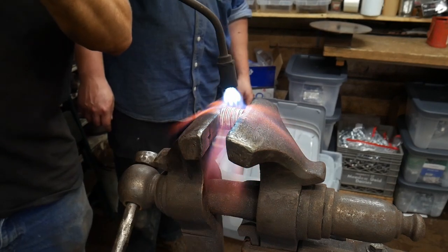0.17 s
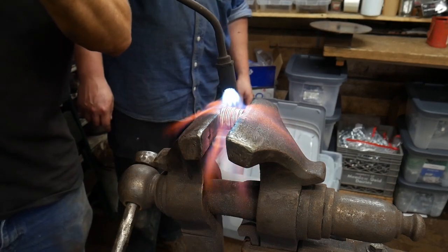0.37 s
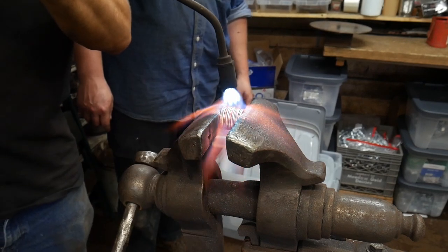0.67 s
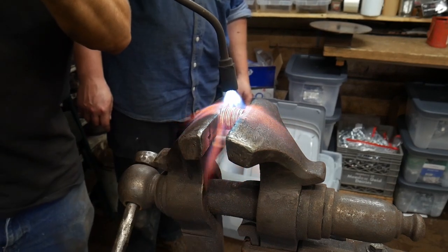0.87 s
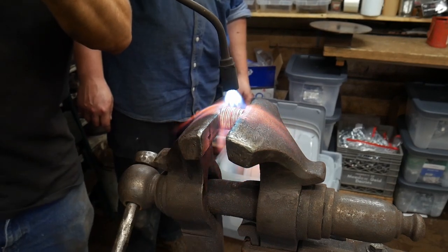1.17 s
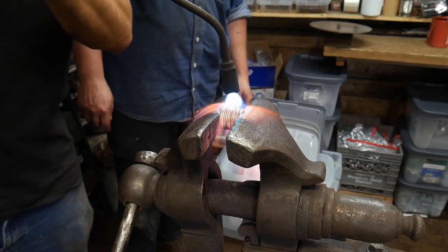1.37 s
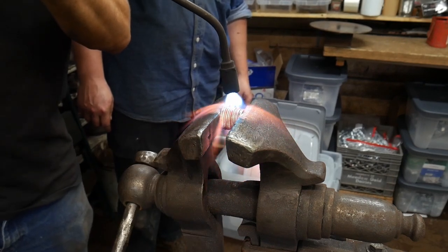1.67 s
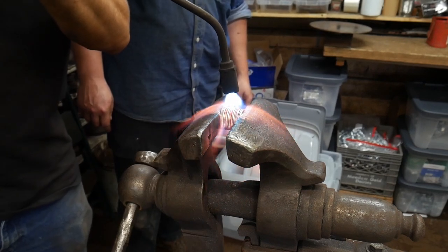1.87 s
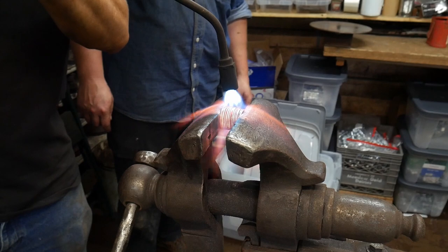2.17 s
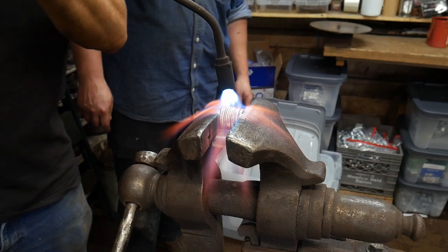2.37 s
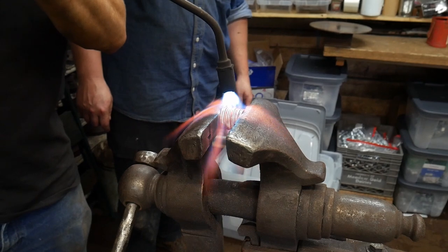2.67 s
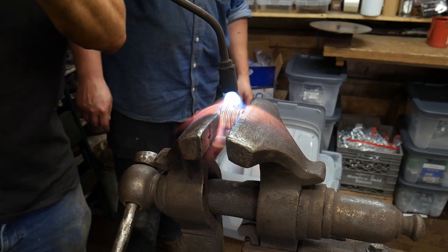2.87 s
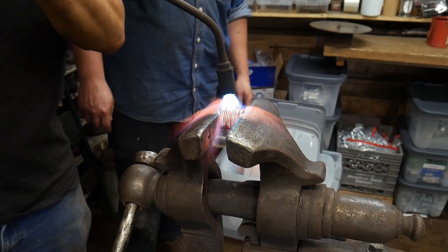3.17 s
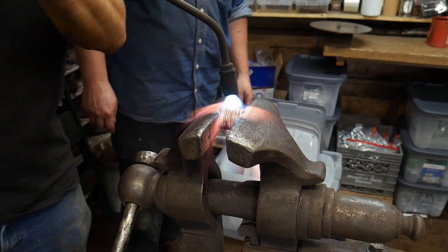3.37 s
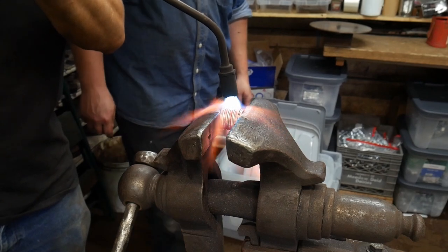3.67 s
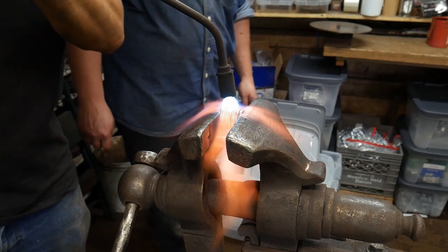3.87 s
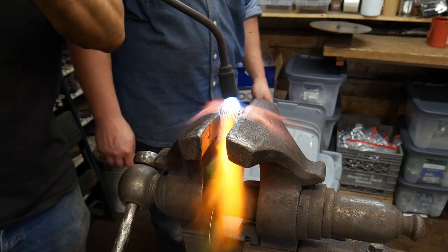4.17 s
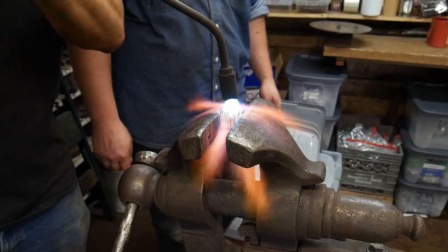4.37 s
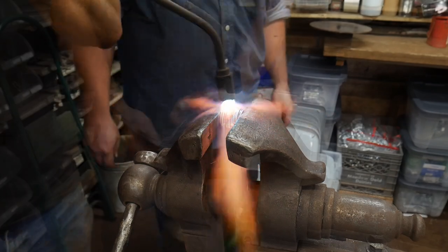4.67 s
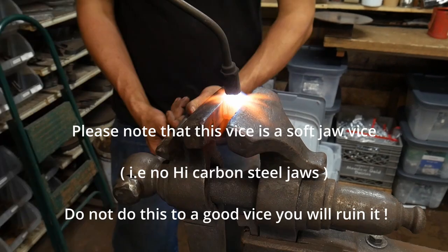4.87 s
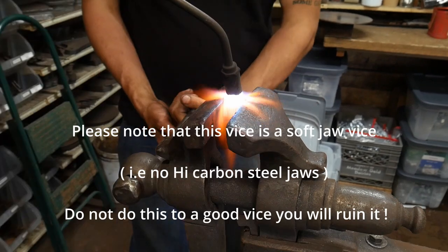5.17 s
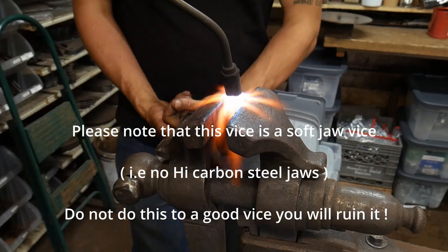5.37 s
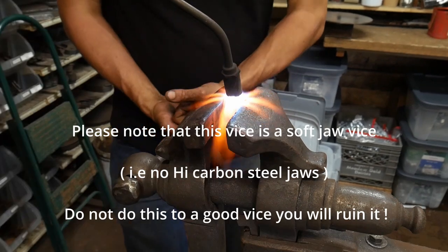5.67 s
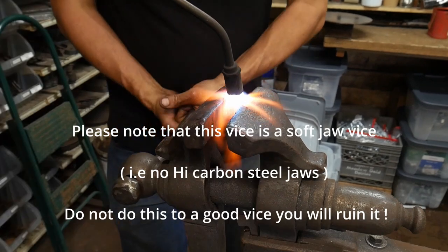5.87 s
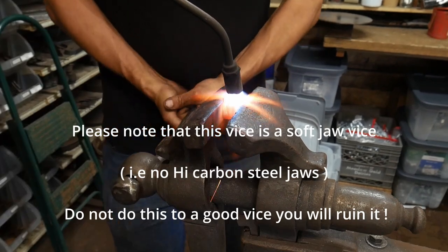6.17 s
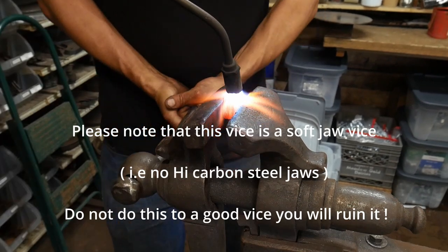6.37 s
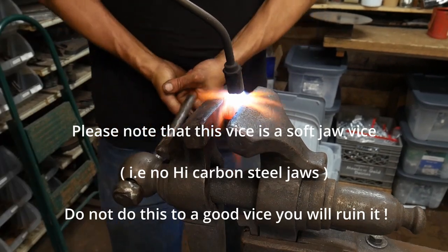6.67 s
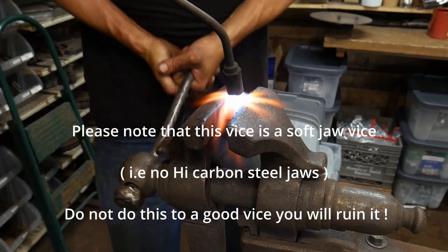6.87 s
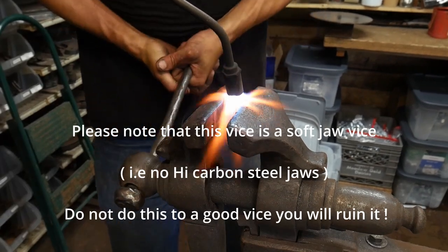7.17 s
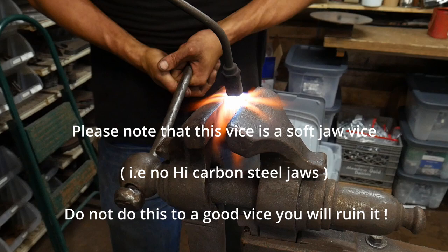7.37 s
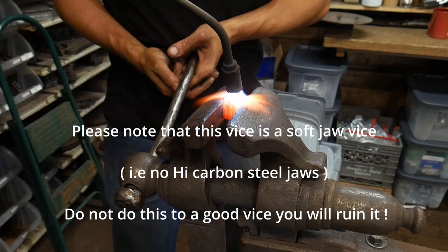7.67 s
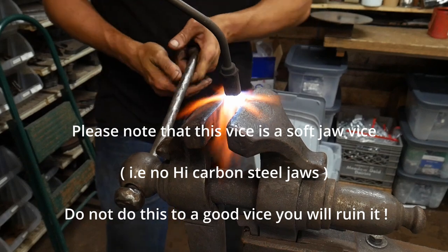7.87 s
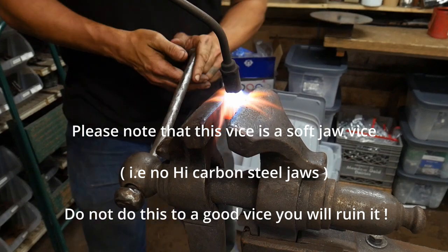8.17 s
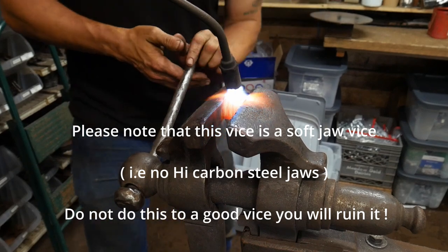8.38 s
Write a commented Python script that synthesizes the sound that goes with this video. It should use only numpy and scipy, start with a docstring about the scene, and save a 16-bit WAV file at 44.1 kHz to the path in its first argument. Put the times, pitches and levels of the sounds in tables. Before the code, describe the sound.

Already burning at the start, a strong torch jet rushes against metal in a small dry workshop. The first half is fuller and fairly steady with small wavers and sizzling bursts. After a few half-whistling swishes, the hiss turns brighter and choppier, surging and dipping several times a second over a stronger combustion roar. Close microphone, central image, soft low air puffs; it is still burning at the end.

```python
"""A hand-held gas torch, close to the microphone, heats a piece of steel held in a vice in a small workshop.
The jet is shaped noise that hisses on the metal, swelling and changing pitch with each pass of the hand,
and sizzles where it splits over an edge. Combustion adds a soft broad roar, the outer flame a low flutter.
The vice, the bench and the walls colour the flame; stirred air rumbles on the microphone."""
import sys
import numpy as np
from scipy import signal
from scipy.fft import rfft, irfft, next_fast_len
from scipy.io import wavfile
from scipy.ndimage import uniform_filter1d, map_coordinates

SR = 44100
rng = np.random.default_rng(int(sys.argv[2]) if len(sys.argv) > 2 else 0)


def int16_out(signal):
    """Quantize to a 16-bit WAV file."""
    q = np.round(np.clip(np.atleast_2d(signal).T, -1, 1) * 32767)
    wavfile.write(sys.argv[1], SR, q.astype(np.int16))


N = 376173  # length in samples
FRAME = 512  # samples in each frame of shaped noise
TOP_HZ = 15720  # upper band limit
PASS_RAMP_S, EDGE_RAMP_S = 0.076, 0.048  # ramps: passes, lulls, flares and puffs; edges and slips

# How the nozzle is held; it is tipped closer to the edge midway.
# Each row: time in seconds, resting hiss centre in Hz, resting sizzle in dB per Hz before its trim.
NOZZLE_AIM = [(0.0, 4220, -88), (4.6, 4410, -84.5), (4.9, 4660, -78.5), (8.53, 4700, -79)]
# Each pass of the jet over the steel swells and retunes the hiss.
# Each row: start in seconds, length in seconds, swell in dB before doming, hiss centre in Hz before small shifts.
STEEL_PASSES = [(0.119, 0.15, 3, 4590.0), (0.294, 0.183, 1.5, 4710.0), (0.547, 0.21, 1.2, 4320),
                (0.919, 0.15, 2.6, 4600.0), (1.204, 0.37, 2.0, 4500), (1.553, 0.33, 3.0, 4570.0),
                (2.05, 0.3, 2.5, 4660.0), (2.556, 0.33, 2.5, 4400.0), (3.058, 0.084, 4.5, 4370.0),
                (3.438, 0.16, 5.5, 4580), (3.782, 0.14, 1.7, 4800), (4.087, 0.15, 5.5, 4470),
                (4.246, 0.37, 5, 4600), (4.743, 0.213, 3.5, 4450.0), (5.126, 0.18, 6, 4780.0),
                (5.433, 0.23, 5.5, 4290.0), (5.916, 0.128, 7, 4960), (6.236, 0.17, 4.1, 4300.0),
                (6.485, 0.164, 6, 5030.0), (6.688, 0.23, 6.5, 4990.0), (7.13, 0.139, 5, 4560.0),
                (7.426, 0.15, 3, 5360.0), (7.715, 0.134, 4, 4870), (8.012, 0.19, 2.5, 4990.0),
                (8.24, 0.43, 7, 4500)]
# The roar drops out for a moment. Each row: start in seconds, length in seconds, dip in dB.
ROAR_LULLS = [(5.32, .1, 2), (5.69, .13, 3), (6.577, .21, 5.5), (6.959, .144, 1.5), (7.251, .22, 3.5),
              (7.94, .086, 7.5)]


def amp(db):
    """Decibels to gain."""
    return 10 ** (np.asarray(db) / 20)


def unit(x):
    """Scale to rms 1."""
    return x / np.sqrt(np.mean(x ** 2) + 1e-20)


def along(points, hz):
    """Read (Hz, value) points on a log frequency axis."""
    f, v = np.transpose(points)
    return np.interp(np.log(hz + 1), np.log(f + 1), v)


def curves(rows, t):
    """Each column after the time, read at times t."""
    s, *cols = np.transpose(rows)
    return [np.interp(t, s, c) for c in cols]


def wobble(rate):
    """A smooth random curve, rate knots a second."""
    knots = rng.standard_normal(int(N * rate / SR) + 4)
    return map_coordinates(knots, [np.arange(N) * rate / SR])


def tremor(t, rate):
    """The unsteady hand: a smooth random curve read at times t."""
    return np.interp(t, np.arange(N) / SR, wobble(rate))


def arch(t, start, length):
    """Half a sine over an event, zero outside it."""
    return np.sin(np.pi * np.clip((t - start) / length, 0, 1))


def swells(rows, t, ramp_s):
    """Summed dB of (start, length, dB) events that ramp up, hold and ramp down."""
    total_db = 0
    for start, length, db, *_ in rows:
        inside_s = np.minimum(t - start, start + length - t)  # negative outside the event
        total_db = total_db + db * np.clip(.5 + inside_s / ramp_s, 0, 1)
    return total_db


def filtered(x, response):
    """x times a response of frequency."""
    m = next_fast_len(N + SR // 2)
    return irfft(rfft(x, m) * response(np.fft.rfftfreq(m, 1 / SR)), m)[..., :N]


def turbulence(density, patchy_db):
    """Noise that follows density(hz, t), an amplitude per root Hz, with eddies as patches of random gain."""
    white = rng.standard_normal(N) * np.sqrt(SR / 2)
    hz, t, z = signal.stft(white, SR, nperseg=FRAME)
    eddies = uniform_filter1d(rng.standard_normal(z.shape), size=9, axis=0)
    eddies = uniform_filter1d(eddies, size=10, axis=1)
    z = z * density(hz[:, None] + 1, t) * amp(patchy_db * unit(eddies))
    return signal.istft(z, SR, nperseg=FRAME)[1][:N]


def rush(spectrum, level_db):
    """Noise of one colour at a changing level."""
    noise = unit(filtered(rng.standard_normal(N), lambda hz: amp(along(spectrum, hz))))
    return noise * amp(level_db)


def pass_db(t, dome=0.27):
    """The swell of the hiss: each pass ramps up, crests in its middle and ramps down."""
    total_db = 0
    for start, length, db, _ in STEEL_PASSES:
        rounding = 1 + dome * (arch(t, start, length) - 2 / np.pi)  # 2 / pi is the mean of the arch
        total_db = total_db + swells([(start, length, db)], t, PASS_RAMP_S) * rounding
    return total_db


def slips(t):
    """Decibels of hiss and of sizzle taken away while the jet is off the steel."""
    # The jet slips off for an instant and dulls. Each row: start in seconds, length in seconds,
    # hiss dip in dB, sizzle dip in dB (negative is a lift).
    slip_rows = [(0.038, .088, 1, 6.5), (1.012, .053, .7, 5.6), (1.933, 0.057, 0, 6), (2.463, .062, 0, 5),
                 (3.149, .13, 2, 7), (3.618, .04, 3.4, 2), (4.624, .089, .5, 5), (6.96, .077, 3, -0.5)]
    hiss_rows = [(start, length, hiss_dip) for start, length, hiss_dip, _ in slip_rows]
    sizzle_rows = [(start, length, sizzle_dip) for start, length, _, sizzle_dip in slip_rows]
    return [swells(rows, t, EDGE_RAMP_S) for rows in (hiss_rows, sizzle_rows)]


def jet_db(t, lull_share=.42):
    """Level of the hiss: it swells in each pass, sinks in slips and shares part of each lull's dip."""
    # The hiss between passes. Each row: time in seconds, level in dB per Hz before its trim.
    jet_rest = [(0.0, -67), (2.95, -68), (3.3, -69.5), (4.05, -68.7), (4.68, -73.0), (5.05, -75),
                (6.4, -71), (7.02, -75.5), (7.4, -73.5), (8.53, -72)]
    lull_db = lull_share * swells(ROAR_LULLS, t, PASS_RAMP_S)
    return curves(jet_rest, t)[0] + pass_db(t) - lull_db - slips(t)[0]


def jet_centre(t, lull_octaves_per_db=.014, sag_octaves_per_db=0.01):
    """The hiss arches from its resting pitch to that of each pass and back; slips and lulls shift it."""
    rest_hz = curves(NOZZLE_AIM, t)[0]
    arches = sum((top_hz - rest_hz) * arch(t, start, length) for start, length, _, top_hz in STEEL_PASSES)
    lift = lull_octaves_per_db * swells(ROAR_LULLS, t, PASS_RAMP_S)  # it thins upwards as the roar drops
    sag = sag_octaves_per_db * slips(t)[1]  # it falls as a slip takes away sizzle
    return (rest_hz + arches) * 2 ** (lift - sag)


def hiss(hz, t, skirt_db=39, round_octaves=1.66, trim_db=-0.08, usual_hz=4600, steepen=2.5, swish_octaves=0.25):
    """Jet noise: one broad hump whose centre moves with the gap between nozzle and steel."""
    # The jet crosses a gap and swishes, half whistling. Each row: start in seconds, end in seconds,
    # from Hz, to Hz, boost in dB before its shaping (negative hollows the glide).
    swishes = [(.0, .2, 4600, 6200, 1), (2.98, 3.198, 5700, 5800, 2), (3.15, 3.42, 5700, 5500, -3.5),
               (3.42, 3.617, 4200, 8300, 1), (4.02, 4.227, 5330, 6000, 3), (4.35, 4.52, 3300, 6200, 6.5),
               (4.513, 4.638, 6100, 4000, 7.5)]
    level_db = jet_db(t)
    centre_hz = jet_centre(t)
    octaves = np.log2(hz / centre_hz)
    # a low hiss loses its top faster
    skirt = skirt_db * np.where(octaves > 0, (usual_hz / centre_hz) ** steepen, 1)
    db = level_db + trim_db - skirt * (np.hypot(octaves, round_octaves) - round_octaves)
    for start, end, from_hz, to_hz, boost_db in swishes:
        u = np.clip((t - start) / (end - start), 0, 1)
        glide_hz = from_hz + u * (to_hz - from_hz)
        peak = np.exp(-(np.log2(hz / glide_hz) / swish_octaves) ** 2)
        db = db + boost_db * np.sin(np.pi * u) * (peak - .3)  # a boosted peak draws energy from its sides
    return amp(db)


def sizzle(hz, t, corner_hz=12000, slope=3.1, trim_db=0.26, tremor_db=1.66):
    """The finest eddies, shed high in pitch where the jet splits over an edge."""
    # The jet meets an edge. Each row: start in seconds, length in seconds, rise in dB.
    edges = [(0.162, 0.12, 8.1), (0.694, 0.1, 6), (0.866, 0.139, 7), (1.112, 0.418, 9.5),
             (1.707, 0.23, 7.5), (2.085, 0.081, 6.1), (2.284, 0.137, 7.1), (2.701, 0.19, 10.3),
             (2.983, 0.049, 7), (3.083, 0.063, 11.8), (3.53, 0.077, 13), (3.642, 0.23, 7),
             (3.886, 0.104, 10), (4.167, 0.051, 13.4), (4.264, 0.056, 11.1), (4.498, 0.056, 12.8),
             (4.771, 0.22, 7.5), (5.035, 0.031, 6.4), (5.214, 0.15, 10.5), (5.465, 0.31, 9.1),
             (5.884, 0.19, 4.6), (6.157, 0.11, 9.6), (6.295, 0.137, 8), (6.521, 0.26, 9.5),
             (6.858, 0.14, 8.2), (7.181, 0.15, 11.5), (7.378, 0.085, 8.0), (7.58, 0.12, 12),
             (7.733, 0.053, 7.1), (7.896, 0.16, 10), (8.37, 0.046, 7.1)]
    level_db = curves(NOZZLE_AIM, t)[1] + swells(edges, t, EDGE_RAMP_S) - slips(t)[1]
    level_db = level_db + trim_db + tremor_db * tremor(t, 26)
    return amp(level_db) / np.sqrt(1 + (corner_hz / hz) ** slope)


def burn_db(t, roar_share=.13):
    """Strength of the combustion: it takes up part of each pass's swell and drops in the lulls."""
    # Combustion in the flame. Each row: time in seconds, roar in dB per Hz before its trim.
    burn_rest = [(0.0, -83.5), (0.5, -84.3), (1.5, -79), (1.9, -82), (3.4, -80.0), (4.7, -81.5),
                 (5.3, -76.5), (5.8, -78.5), (6.3, -78.5), (7.0, -81.5), (8.3, -78.5), (8.53, -82)]
    return curves(burn_rest, t)[0] + roar_share * pass_db(t) - swells(ROAR_LULLS, t, PASS_RAMP_S)


def roar(hz, t, low_hz=250, high_hz=2500, slope=2.6, trim_db=-0.42):
    """Combustion noise: a plateau that rolls off at both ends."""
    roll_off = (1 + (hz / high_hz) ** slope) * (1 + (low_hz / hz) ** 4)
    return amp(burn_db(t) + trim_db) / np.sqrt(roll_off)


def plume(plume_db=-1, lick_db=3.3):
    """The soft outer flame licks round the jaws, flares now and then and shrinks in the lulls."""
    # Size of the soft outer flame. Each row: time in seconds, flutter in dB before its trim.
    plume_size = [(0, -66), (1.2, -64.5), (2.3, -65), (3.6, -62.5), (4.6, -63), (5.3, -59), (6.4, -63),
                  (6.75, -68), (7.7, -64.5), (8.53, -70)]
    # It flares round the jaws. Each row: start in seconds, length in seconds, rise in dB.
    flares = [(1.33, .27, 6), (3.85, .2, 2.5), (7.0, .1, 4)]
    # Colour of the flutter. Each row: frequency in Hz, relative level in dB.
    flutter_colour = [(30, -28), (70, -13), (130, 0), (190, 4.5), (300, 1), (600, -48), (2000, -70)]
    t = np.arange(N) / SR
    flare_db = swells(flares, t, PASS_RAMP_S)
    level_db = curves(plume_size, t)[0] + flare_db - swells(ROAR_LULLS, t, PASS_RAMP_S)
    return rush(flutter_colour, level_db + plume_db + lick_db * wobble(12))


def torch(rasp_db=0.5, flicker_db=0.58):
    """The flame: a rasping jet over the roar and the fluttering plume, coloured by the space round the jaws."""
    # Broad peaks and dips of that space. Each row: centre in Hz, width at half the dB in Hz, gain in dB.
    jaw_colour = [(880, 530, 3.5), (1260, 104, 3), (1570, 140, -2.5), (1840, 480, 2.5), (2348, 280, 3.5),
                  (2906, 750, -3.5), (3596, 420, 2.5), (4375, 950, -3.5), (5730, 940, 3), (6590, 680, 2),
                  (7270, 400, -1.5), (9050, 1200, 0.5), (10550, 1500, -2.2), (12200, 1100, 1),
                  (13550, 1000, 1), (15300, 1200, -4.5)]
    jet = turbulence(hiss, patchy_db=1.02) + turbulence(sizzle, patchy_db=1.4)
    jet = jet * amp(rasp_db * wobble(1200) + flicker_db * wobble(45))  # the gas strikes in tiny bursts
    flame = jet + turbulence(roar, patchy_db=0.8) + plume()

    def bells_db(hz):
        return sum(db * .5 ** ((2 * (hz - centre) / width) ** 2) for centre, width, db in jaw_colour)

    return filtered(flame, lambda hz: amp(bells_db(hz)))


def bounce(x):
    """A close reflection combs the flame's sound; the comb slides as the torch moves."""
    # The nearest surface throws the sound back. Each row: time in seconds, delay in ms, strength from 0 to 1.
    near_surface = [(0, 1.7, 0.13), (3.6, 1.63, 0.05), (4.6, 1.9, 0.01), (4.9, 2.2, .15), (5.5, 1.95, 0.2),
                    (5.8, 1.7, 0.06), (6.1, 1.56, 0.14), (6.6, 1.36, .17), (7.2, 1.47, 0.1),
                    (7.55, 1.4, .06), (7.75, 2.06, 0.04), (8.53, 1.8, 0.14)]
    n = np.arange(N)
    delay_ms, strength = curves(near_surface, n / SR)
    delay = delay_ms * SR / 1000  # in samples
    return x + strength * map_coordinates(x, [n - delay])


def workshop(x, t60, count=9):
    """The short diffuse answer of the cluttered room, about as loud as x; it drifts as the torch moves."""
    t = np.arange(SR // 3) / SR
    tails = rng.standard_normal((count, len(t))) * amp(-60 * t / t60) * (t > .003)
    tails = tails / np.linalg.norm(tails, axis=1, keepdims=True)
    answers = signal.fftconvolve(x[None], tails, axes=1)[:, :N]
    position = np.linspace(0, count - 1, N)
    share = np.clip(1 - abs(position - np.arange(count)[:, None]), 0, 1)  # crossfade from tail to tail
    return np.sum(answers * np.sqrt(share), axis=0)


def draught(gust_db=3):
    """Air stirred by the flame rumbles faintly on the microphone."""
    # Moving air at the microphone. Each row: time in seconds, resting rumble in dB.
    air_level = [(0, -79), (4.4, -78), (4.9, -68.5), (8.53, -70.5)]
    # Stirred air puffs on the microphone. Each row: start in seconds, length in seconds, rise in dB.
    puffs = [(2.6, .2, 6), (3.04, 0.34, 12), (3.48, .12, 9), (5.2, .35, 11), (5.65, .3, 8), (7.03, .15, 7),
             (7.32, .14, 7), (7.7, 0.24, 8)]
    # Colour of the rumble. Each row: frequency in Hz, relative level in dB.
    rumble_colour = [(4, -11), (10, 2), (20, -1), (30, -13), (42, -13), (60, -24), (120, -45), (400, -120)]
    t = np.arange(N) / SR
    level_db = curves(air_level, t)[0] + swells(puffs, t, PASS_RAMP_S)
    return rush(rumble_colour, level_db + gust_db * wobble(9))


def widen(x, t60=0.034):
    """A faint smeared copy, opposite in the two channels, gives the nearly mono sound a slight width."""
    # Stereo width. Each row: frequency in Hz, side minus mid in dB.
    side_level = [(60, -17), (180, -20), (5000, -21.5), (15000, -18.5)]
    t = np.arange(SR // 10) / SR
    smear = rng.standard_normal(len(t)) * amp(-60 * t / t60) * (t > .001)
    smeared = signal.fftconvolve(x, smear / np.linalg.norm(smear))[:N]
    side = filtered(smeared, lambda hz: amp(along(side_level, hz)))
    return np.array([x + side, x - side])


def scene(room_db=-13):
    """The torch burns straight ahead in the workshop; stirred air puffs softly on the microphone."""
    direct = bounce(torch())
    room = amp(room_db) * workshop(direct, t60=0.1)
    return widen(direct + room + draught())


def record(dry):
    """The recorder keeps nothing above its band limit."""
    return filtered(dry, lambda hz: hz < TOP_HZ)


dry = scene()
out = record(dry)
int16_out(out)
```